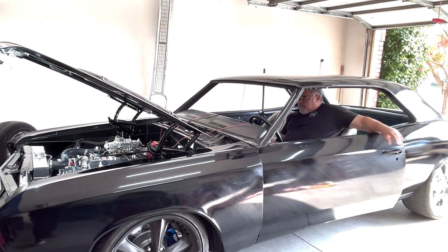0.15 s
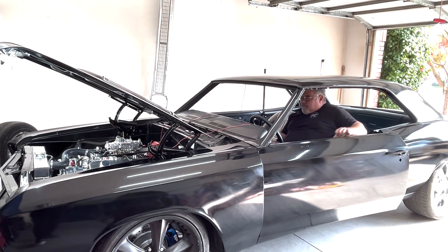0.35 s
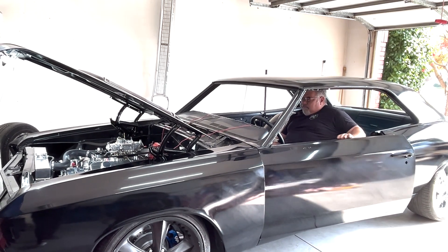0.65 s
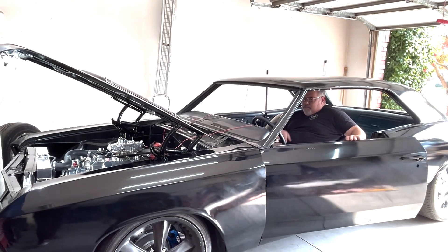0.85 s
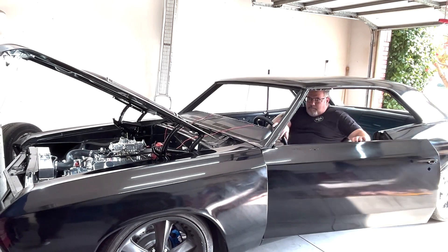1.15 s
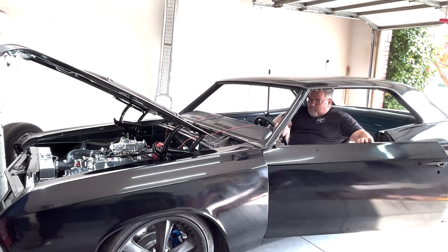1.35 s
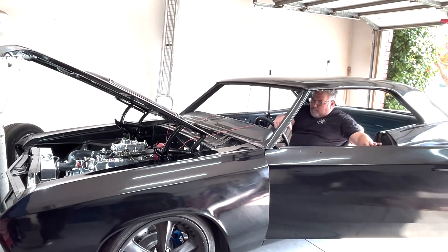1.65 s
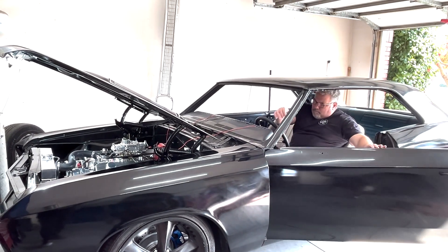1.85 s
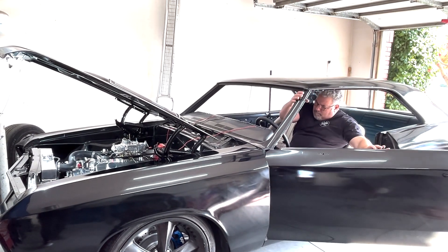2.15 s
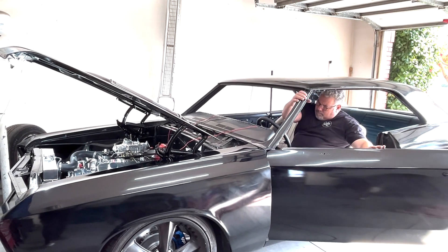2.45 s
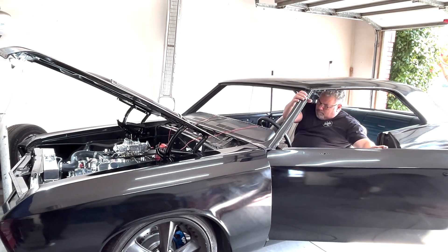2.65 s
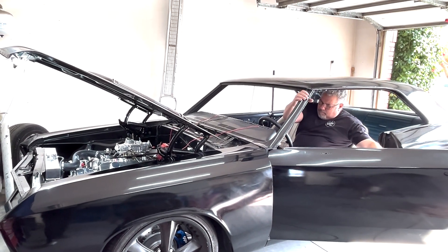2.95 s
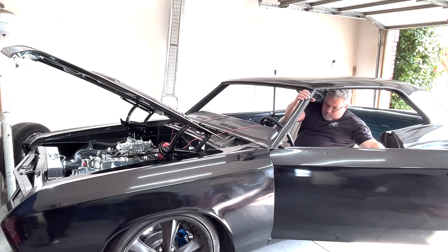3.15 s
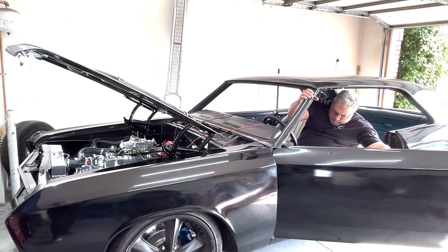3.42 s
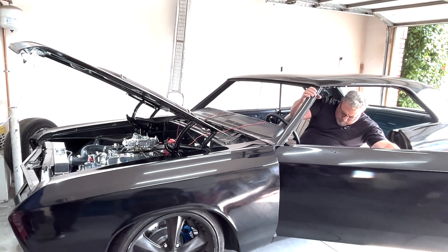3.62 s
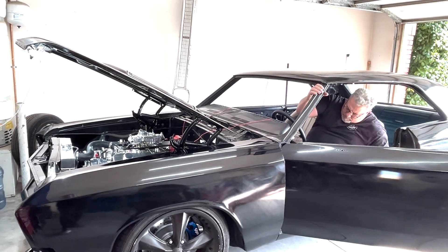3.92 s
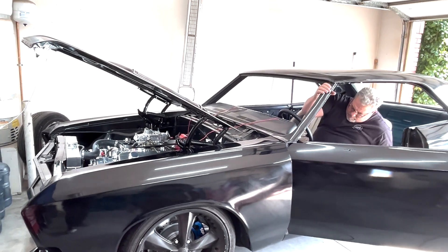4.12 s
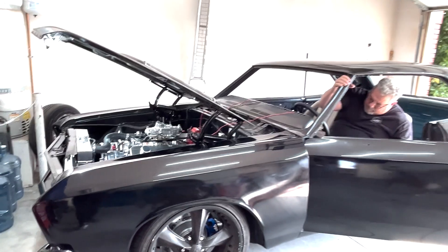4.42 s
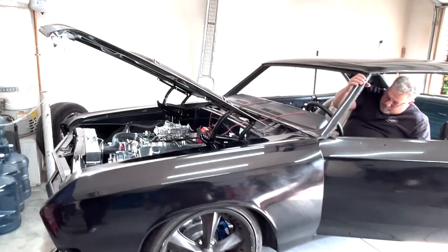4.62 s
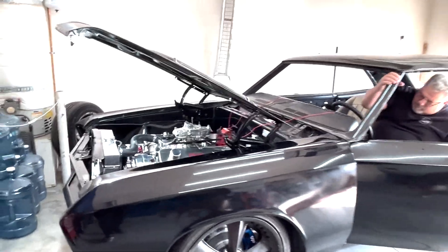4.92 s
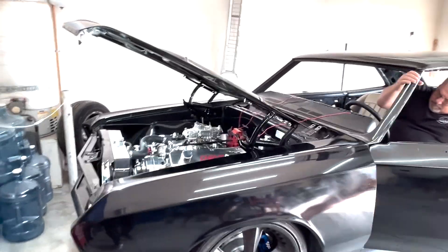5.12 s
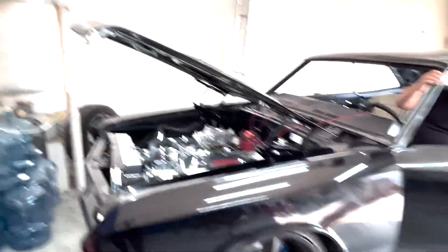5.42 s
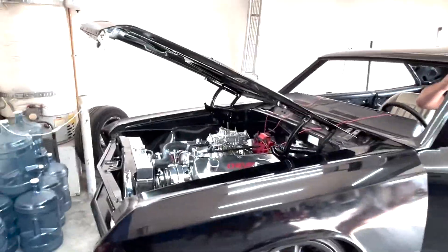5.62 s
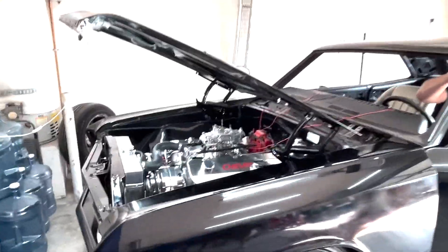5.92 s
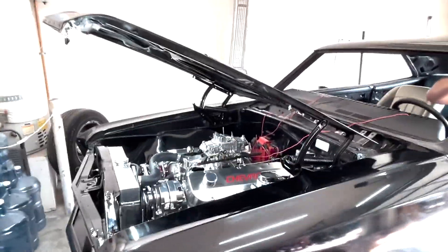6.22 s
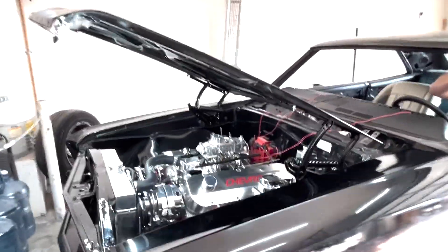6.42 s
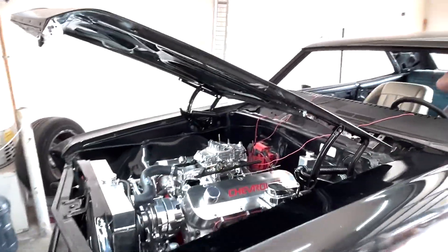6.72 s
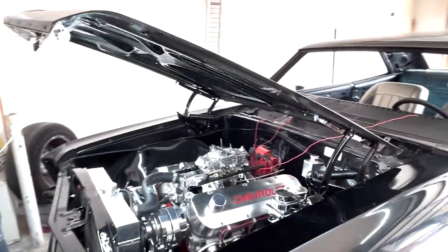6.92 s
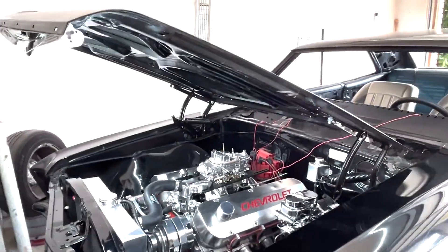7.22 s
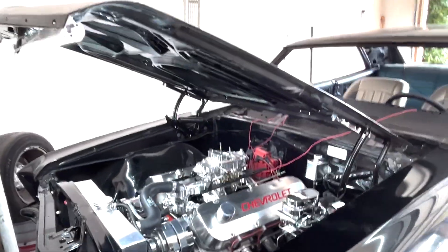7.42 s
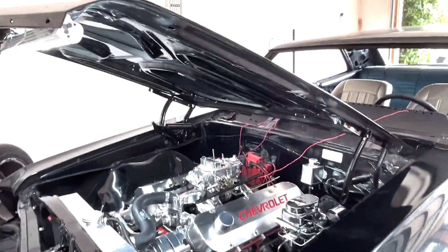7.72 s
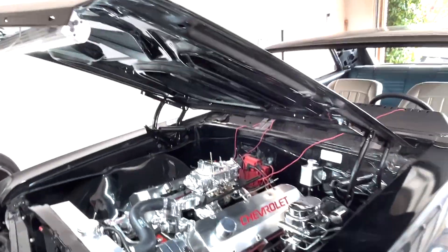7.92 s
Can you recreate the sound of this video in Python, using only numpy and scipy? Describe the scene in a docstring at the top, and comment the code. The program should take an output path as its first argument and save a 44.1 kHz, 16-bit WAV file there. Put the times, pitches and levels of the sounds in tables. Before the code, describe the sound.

A big V8 idles with a lumpy, loping rumble in a hard-walled garage, is revved once briefly, then settles back to uneven idle.

```python
"""A large V8 with a lumpy camshaft idles in a hard-walled garage, hood open: uneven exhaust pulses ring the
pipes and the garage air, fan and valve gear rush as shaped noise, the open carburettor hisses and gulps.
Near 4.7 s the throttle is blipped once: firings speed up, the drone clears and gliding sine overtones join.
From about 6 s the engine lopes at idle again. Meanwhile the microphone pair is carried from the door
towards the engine bay, which reweighs the resonances."""
import sys
import numpy as np
from scipy import signal
from scipy.fft import rfft, irfft, next_fast_len
from scipy.io import wavfile
from scipy.ndimage import uniform_filter1d

SR = 44100
rng = np.random.default_rng(int(sys.argv[2]) if len(sys.argv) > 2 else 0)


def dump_mix(stems):
    """Bounce the given channels to the path in sys.argv[1] as a 16-bit WAV at rate SR."""
    frames = np.atleast_2d(stems).T  # one column per channel
    limited = np.clip(frames, -1, 1)  # hard clip at full scale
    pcm = np.round(limited * 32767).astype(np.int16)
    wavfile.write(sys.argv[1], SR, pcm)


N = 355887
SIZE = next_fast_len(N, True)
BIN_HZ = np.maximum(np.arange(SIZE // 2 + 1) * SR / SIZE, 1)


# Crank and standpoint. Each row: time in seconds, firings per second, unevenness of the burns in dB,
# nearness to the engine bay 0-1.
CRANK = [(0, 73.4, 4, 0), (1.8, 75.8, 8, 0.03), (2.3, 61.5, 6, 0), (4.65, 66.6, 6.5, 0.07),
         (4.92, 105.6, 2, 0.27), (5.2, 111, 4, 0.33), (5.5, 100, 1.5, 0.37), (5.8, 99, 4, 0.48),
         (6.1, 81.4, 5.5, 0.67), (6.4, 69, 6, 0.73), (7.2, 61.2, 5.5, 0.76), (8.07, 64, 7, 0.93)]
# Load on the exhaust. Each row: time in seconds, drone between thumps in dB, bark in dB, thrum in dB.
LOAD = [(0.0, -19.5, -24, -36), (0.5, -38, -26, -25), (0.74, -20, -18, -29), (0.9, -23.5, -23.5, -26.5),
        (2.0, -24, -26, -29.5), (3.4, -23.5, -23, -24.5), (4.2, -20.5, -24, -32), (4.7, -24, -26.5, -27),
        (4.8, -25.5, -19.5, -24), (4.98, -7.5, -18, -24), (5.2, -10.5, -20.5, -29.69),
        (5.55, -12.5, -20, -30), (5.8, -21, -28.5, -41), (6.2, -20.5, -21.5, -41), (6.9, -21, -27, -32),
        (7.4, -25.5, -27, -27.5), (8.07, -20.5, -23, -34)]
# Runs of strong burns thump in the pipes. Each row: top in seconds, length in seconds, drone in dB.
THUMPS = [(0.067, 0.2, -30), (0.231, 0.28, -24.5), (0.48, 0.24, -18), (0.616, 0.18, -21.5),
          (0.762, 0.08, -32), (0.942, 0.054, -18), (1.177, 0.063, -23), (1.354, 0.11, -25),
          (1.621, 0.096, -23), (1.708, 0.31, -32), (1.877, 0.038, -27), (1.944, 0.057, -26.1),
          (2.091, 0.039, -31), (2.219, 0.11, -22), (2.321, 0.2, -32), (2.496, 0.11, -22),
          (2.669, 0.28, -27), (2.869, 0.056, -24), (2.999, 0.29, -28.5), (3.253, 0.042, -23),
          (3.375, 0.096, -20.5), (3.48, 0.077, -19), (3.571, 0.06, -17), (3.719, 0.12, -22.1),
          (3.831, 0.073, -21), (3.939, 0.031, -22), (4.143, 0.11, -19), (4.252, 0.091, -31),
          (4.508, 0.12, -14.5), (4.596, 0.11, -22), (4.663, 0.096, -19), (4.94, 0.073, -30),
          (5.0, 0.05, -23), (5.075, 0.069, -20), (5.165, 0.11, -15), (5.275, 0.07, -27),
          (5.335, 0.045, -35), (5.395, 0.081, -17), (5.455, 0.051, -17), (5.545, 0.13, -18),
          (5.647, 0.07, -12.5), (5.747, 0.13, -15), (5.861, 0.052, -17), (6.066, 0.12, -15.5),
          (6.294, 0.09, -16.5), (6.44, 0.16, -25), (6.514, 0.065, -21), (6.706, 0.19, -14),
          (6.919, 0.091, -17), (7.092, 0.29, -21), (7.227, 0.15, -19), (7.446, 0.21, -21),
          (7.554, 0.076, -20), (7.62, 0.078, -15.5), (7.769, 0.19, -26), (7.892, 0.084, -17),
          (7.989, 0.21, -22.5)]
# Failed burns change the note. Each row: top in seconds, length in seconds, drone change in dB,
# bark change in dB.
MISFIRES = [(0.357, 0.13, -3, -1), (0.81, 0.074, -1, -4), (0.879, 0.086, 0, -3), (1.47, 0.045, -7, 2.5),
            (1.785, 0.11, -6, 4), (2.055, 0.036, -10, -5), (2.169, 0.073, -8, 2), (2.256, 0.044, -11, 0),
            (2.424, .06, -2, 0.5), (2.546, 0.088, -3, -1), (2.805, .08, -2, -2.5), (2.999, 0.18, 0.5, -3),
            (3.32, .09, -9, -1), (3.421, 0.095, -11, -5.5), (3.648, 0.062, -5, -7), (3.881, .08, -4, -3),
            (3.992, 0.058, -5, -2), (4.37, 0.11, -1.5, -5), (4.558, 0.038, -9, -1), (4.69, .08, 1, 2.5),
            (5.126, 0.045, -3, -3), (5.222, .07, -6, -1.5), (5.413, 0.11, 0.5, -2),
            (5.482, 0.068, -1, -3.5), (5.676, 0.035, -10, -1), (5.829, 0.072, -1, 2), (6.196, .2, -4.5, -6),
            (6.48, 0.05, -6.5, -4), (6.713, 0.038, -13, 0.5), (6.835, 0.13, -4, -0.5), (6.97, .07, -4, -3),
            (7.354, 0.17, -3, -5), (7.522, 0.044, -7, 7), (7.691, 0.083, -10, -8)]
# The idle lopes, about three times a second. Each row: top in seconds, length in seconds, boom in dB.
LOPES = [(0.24, 0.3, -24), (0.55, 0.59, -27), (1.053, 0.18, -34), (1.437, 0.087, -25), (1.878, 0.18, -37),
         (2.249, 0.27, -30), (2.915, 0.11, -21), (3.32, 0.13, -24), (3.674, 0.32, -25), (4.163, 0.35, -23),
         (4.503, 0.35, -23), (4.887, 0.26, -22), (5.48, 0.14, -25), (5.91, 0.47, -29), (6.125, 0.27, -22),
         (6.533, 0.22, -30), (6.697, 0.25, -31), (6.976, 0.56, -28), (7.306, 0.45, -32), (7.596, 0.19, -32),
         (7.8, 0.16, -23), (7.95, 0.16, -28)]
THUMP_BARK_DB = -17.5   # bark of a thump, added to the loaded bark
LOPE_BARK_DB, LOPE_THRUM_DB, THRUM_LATE_S = 2, 3, 0.34


def exhaust():
    """One train of burns excites five groups of resonances in pipes and air; the blip adds overtones."""
    per_s, uneven_db, near = in_time(CRANK)
    drone_db, bark_db, thrum_db = in_time(LOAD)
    pulses = firings(per_s, uneven_db, jitter_s_per_db=0.0004087)
    thumps = swells(THUMPS)
    drone_holes = from_db(lifts([(s, length_s, db) for s, length_s, db, _ in MISFIRES]))
    bark_holes = from_db(lifts([(s, length_s, db) for s, length_s, _, db in MISFIRES]))

    lope = [(s, length_s, 0) for s, length_s, _ in LOPES]
    bark_gain = from_db(bark_db + LOPE_BARK_DB * (swells(lope) - 1.5))
    bark_gain = (bark_gain + from_db(THUMP_BARK_DB) * thumps) * bark_holes
    thrum_db = thrum_db + LOPE_THRUM_DB * (swells(lope, late_s=THRUM_LATE_S) - .5)

    out = drone_holes * drone(pulses, per_s, near, from_db(drone_db), thumps)
    out = out + bark_gain * bark(pulses, near)
    out = out + throat(pulses, near, bark_gain)
    out = out + boom(pulses, near)
    out = out + from_db(thrum_db) * thrum(pulses, near)
    return out + bark_holes * overtones(thumps)


# Strength of each cylinder's burn in dB, in firing order.
CYLINDER_DB = [1.5, -3, 2, -4.5, 0, 2.6, 0, 2]


def firings(per_s, uneven_db, jitter_s_per_db):
    """A pulse a firing, off in time and strength by chance; a second, scrambled train feeds the side."""
    at = np.flatnonzero(np.diff(np.floor(np.cumsum(per_s) / SR)))
    chance = rng.standard_normal((1000, 3))[:len(at)]
    late = chance[:, 0] * jitter_s_per_db * uneven_db[at] * SR   # samples; uneven burns also come off time
    where = np.clip(at + late.astype(int), 0, N - 1)
    chance_db = uneven_db[at] * np.minimum(chance[:, 1], .8)   # a burn can fail, but not exceed a full charge
    pulses = np.full((2, N), 1e-18)
    pulses[0, where] = from_db(np.resize(CYLINDER_DB, len(at)) + chance_db)
    pulses[1, where] = chance[:, 2]
    return pulses / np.sqrt(np.mean(pulses ** 2, axis=1, keepdims=True))


WIDEN = 1.52   # on the nominal width of each of the two stages


def ringing(pulses, modes, near, sustain):
    """Each resonance applied twice, so valleys stay dark; walls sustain it, the standpoint weighs it."""
    out = 0
    for k, (hz, width_hz, *levels_db) in enumerate(modes):
        once = resonance(pulses, hz, WIDEN * width_hz)
        rung = evened(resonance(once, hz, WIDEN * width_hz), 0.18, sustain)
        out = out + (-1) ** k * from_db(by_standpoint(near, levels_db)) * rung
    return out


# Drone of the pipes. Each row: centre in Hz, nominal width in Hz, dB by the door, dB halfway, dB by the bay.
DRONE = [(100.2, 12.6, -4, -3.5, 2.7), (112.5, 12.5, 3.5, 8.5, 5.7), (117.1, 13.8, 5.5, 1, 6.5),
         (127.9, 8.8, -3.5, -2.5, 0.5)]
# Pitch at which the thumps ring clear. Each row: time in seconds, pitch in Hz.
THUMP_PITCH = [(0.0, 112.6), (0.06, 118.3), (0.31, 110.8), (0.54, 120), (0.99, 110.6), (1.1, 120.8),
               (1.24, 109.8), (1.73, 125), (1.84, 106.5), (1.91, 124), (2.02, 126.6), (2.11, 113.2),
               (2.54, 128), (2.79, 112.1), (2.85, 118.6), (3.42, 118), (3.89, 108.9), (4.11, 121.9),
               (4.32, 108.3), (4.65, 118.9), (4.77, 106.3), (4.87, 105.2), (4.92, 111.9), (5.29, 112.1),
               (5.35, 105.8), (5.42, 106.8), (5.5, 100.9), (5.66, 100.9), (5.69, 98.4), (5.82, 98.5),
               (5.86, 104), (6.03, 104.1), (6.08, 109.9), (6.25, 117.2), (6.31, 108.2), (6.49, 116.7),
               (6.63, 104.7), (6.79, 103.6), (7.06, 115.4), (7.28, 102.2), (7.42, 116.8), (7.66, 111.2),
               (7.78, 127.4), (7.87, 107.9), (8.07, 118.5)]
THUMP_CLEAR, DRONE_CLEAR, THUMP_WAVER_HZ = 0.81, 0.25, 1.537   # clear-tone weights, pitch spread
BLIP_CLEAR = 0.68   # share of the pulse-rung drone lost at blip speed; half of it is added as clear tone


def drone(pulses, per_s, near, steady, thumps):
    """Pipes ring between and during thumps, part pulse-excited, part clear tone; clearer at blip speed."""
    blip = BLIP_CLEAR * np.clip((per_s - 85) / 20, 0, 1)
    rough_gain = (1 - blip) * (steady + (1 - THUMP_CLEAR) * thumps)
    clear_gain = (DRONE_CLEAR + blip / 2) * steady + THUMP_CLEAR * thumps
    rung = rough_gain * ringing(pulses, DRONE, near, sustain=0.91) / 2
    rung = rung + clear_gain * clear_ring(THUMP_PITCH, THUMP_WAVER_HZ)
    level = steady + thumps
    return level * evened(rung / level, 0.0604, 0.92)


# Bark of the pipes. Each row: centre in Hz, nominal width in Hz, dB by the door, dB halfway, dB by the bay.
BARK = [(144.4, 5.5, -6.5, -4, -9), (171, 14.7, 1, -3.5, -9), (185, 12.6, -13, 0, -7),
        (196.8, 9.5, -2, -7, -4.5), (210.8, 13.4, -4, -7.5, -18), (236.4, 6.9, 0, -5.5, -1),
        (263, 21.4, -8, -1, -7), (304.7, 9.8, -10.5, -12.5, -20), (320.5, 10.8, -10, -7.5, -19.5),
        (346.6, 7.7, -11.5, -11, -19.5), (395.5, 46, -11, -7.5, -13)]


def bark(pulses, near):
    """Upper pipe resonances, rung by the burns."""
    return evened(ringing(pulses, BARK, near, sustain=0.41), 0.051, 0.48)


# Short header pipes. Each row: centre in Hz, nominal width in Hz, dB by the door, dB halfway, dB by the bay.
THROAT = [(439.4, 37, 6, 1, 3), (552.3, 26, 5, -4, -16), (680, 92, -9, 5, -17), (807, 174, -9.5, 3, 5.5)]
# The header pipes roar up. Each row: top in seconds, length in seconds, lift in dB.
ROARS = [(.63, 0.12, 0), (3.56, 0.13, 9), (4.5, 0.13, 4), (4.86, 0.22, 2.5), (5.04, 0.37, 7.5),
         (5.72, .1, 6)]


def throat(pulses, near, bark_gain):
    """Header pipes ring with the burns and roar with the load, taken as the smoothed bark gain."""
    load = uniform_filter1d(bark_gain, int(.25 * SR))
    gain = from_db(-12 + lifts(ROARS)) * load ** 1.254
    return gain * evened(ringing(pulses, THROAT, near, sustain=0.14), 0.011, 0.38)


# Boom of the garage air. Each row: centre in Hz, nominal width in Hz, dB by the door, dB halfway,
# dB by the bay.
BOOM = [(45.44, 3.3, 1, 8, 1)]
# Pitch at which the garage air booms clear. Each row: time in seconds, pitch in Hz.
BOOM_PITCH = [(0.0, 46.2), (1.01, 48.4), (1.32, 41.0), (1.57, 45.8), (2.18, 42.4), (2.29, 47.0),
              (2.63, 41.8), (2.81, 46.9), (4.54, 43.7), (4.72, 41.0), (4.96, 49.8), (7.12, 45.0),
              (7.26, 41.0), (7.4, 45.5), (7.93, 46.3), (8.07, 51.8)]
# The boom dips or lifts. Each row: top in seconds, length in seconds, change in dB.
BOOM_GAPS = [(1.8, .14, -4), (3.46, 0.17, -16), (4.01, .15, -2), (4.68, .2, -5), (5.3, .4, -2),
             (6.04, 0.097, 1), (6.78, 0.083, 3), (7.5, 0.095, 1), (7.87, 0.082, -10)]
BOOM_REST_DB, BOOM_CLEAR, BOOM_WAVER_HZ = -29, 0.57, 1.29   # level between lopes, clear share, pitch spread


def boom(pulses, near):
    """Garage air rings with the burns and as a clear tone, swelling with each lope."""
    rung = (1 - BOOM_CLEAR) * ringing(pulses, BOOM, near, sustain=1.0)
    rung = rung + BOOM_CLEAR * clear_ring(BOOM_PITCH, BOOM_WAVER_HZ)
    gain = from_db(lifts(BOOM_GAPS)) * (from_db(BOOM_REST_DB) + swells(LOPES))
    # the slow air column cannot follow quick changes
    return resonance(gain * evened(rung, 0.14, 0.7), 36.0, 30)


# Low thrum. Each row: centre in Hz, nominal width in Hz, dB by the door, dB halfway, dB by the bay.
THRUM = [(34.3, 5, -13, -8, -15), (69.5, 3.5, -10, -4, -5), (80.2, 8.2, -8.5, -4.5, -7)]


def thrum(pulses, near):
    """Low resonances of pipes and garage air, rung by the burns."""
    return evened(ringing(pulses, THRUM, near, sustain=.3), 0.14, 0.76)


# Clear overtones of the blip. Each row: start in seconds, end in seconds, start pitch in Hz,
# end pitch in Hz, start level in dB, end level in dB.
OVERTONES = [(4.78, 4.89, 198.2, 197, -23, -25), (4.9, 5.131, 198.8, 198, -22, -17),
             (5.14, 5.412, 199.4, 197, -22, -23), (5.47, 5.6, 197.6, 202, -19, -25),
             (5.65, 5.984, 197.2, 197.4, -25, -29), (4.8, 4.972, 320, 328, -27, -33),
             (4.847, 5.224, 402, 400, -36, -38), (5.097, 5.397, 243, 238.2, -24.5, -30.5),
             (5.146, 5.377, 325, 340, -29.5, -35), (5.401, 5.623, 400, 399, -33.5, -34),
             (5.4, 5.78, 268, 250.3, -28, -31.5), (5.8, 5.917, 241, 240, -28.5, -30)]
OVERTONE_THUMP_DB = 6.5   # lift at a thump gain of 1; follows the root of the gain


def overtones(thumps):
    """Sum of the blip's sines, lifted by the thumps."""
    return from_db(OVERTONE_THUMP_DB * np.sqrt(thumps)) * sum(overtone(*row) for row in OVERTONES)


OVERTONE_WAVER_HZ, OVERTONE_FLUTTER_DB = 2.014, 0.5


def overtone(start_s, end_s, start_hz, end_hz, start_db, end_db):
    """A gliding, fluttering sine that fades in and out, in the mid only."""
    at = np.arange(int(start_s * SR), int(end_s * SR))
    t = at / SR
    ends_s = [start_s, end_s]
    fade = np.clip(np.minimum(t - start_s, end_s - t) / 0.033, 0, 1)
    level_db = np.interp(t, ends_s, [start_db, end_db]) + OVERTONE_FLUTTER_DB * drift(6.2)[at]
    hz = np.interp(t, ends_s, [start_hz, end_hz]) + OVERTONE_WAVER_HZ * drift(2.75)[at]
    out = np.zeros((2, N))
    out[0, at] = fade * from_db(level_db) * np.sqrt(2) * np.sin(2 * np.pi * np.cumsum(hz) / SR)
    return out


def clear_ring(pitch, waver_hz):
    """Pipe or air column rings as a slightly wavering sine, a quarter turn apart in mid and side."""
    turns = np.cumsum(in_time(pitch)[0] + waver_hz * drift(5.08)) / SR
    return np.sqrt(2) * np.array([np.sin(2 * np.pi * turns), -0.4 * np.cos(2 * np.pi * turns)])


# Engine bay. Each row: time in seconds, carburettor hiss between gulps in dB (before the hiss's final lift),
# rush in dB.
BAY = [(0.0, -46, -34.5), (0.7, -47.5, -36.5), (2.0, -46, -35.5), (3.4, -45, -35), (4.3, -45, -33.5),
       (4.69, -42.5, -34), (4.72, -38.5, -31), (4.96, -37.5, -29), (5.2, -41.5, -30.5), (5.8, -43.5, -33),
       (6.3, -43, -33.5), (7.4, -42, -32), (8.07, -42.5, -33.5)]
# The carburettor gulps air. Each row: top in seconds, length in seconds, hiss in dB (before the final lift).
GULPS = [(0.125, 0.083, -56), (0.3, 0.059, -71), (0.87, 0.1, -58), (0.99, 0.1, -57), (1.334, 0.15, -49),
         (1.572, 0.091, -57), (1.7, 0.074, -69), (1.889, 0.12, -52), (2.1, 0.14, -58), (3.1, 0.11, -55),
         (3.02, 0.058, -60), (3.2, 0.06, -54), (3.9, 0.077, -66), (3.55, 0.067, -57), (4.6, 0.062, -56),
         (2.234, 0.08, -55), (2.573, 0.061, -49), (2.738, 0.069, -52), (2.83, 0.071, -52),
         (2.914, 0.13, -48), (3.289, 0.097, -47), (3.462, 0.043, -58), (3.657, 0.11, -48),
         (4.035, 0.12, -46), (4.13, 0.21, -49), (4.38, 0.13, -50), (4.481, 0.18, -50), (4.73, 0.053, -50),
         (4.819, 0.047, -54), (6.294, 0.18, -52), (6.458, 0.13, -52), (6.648, 0.38, -56), (7.112, 0.1, -55),
         (7.45, 0.098, -48), (7.56, 0.14, -51), (7.817, 0.24, -47.5)]
GULP_RISE = 0.46   # share of a gulp spent rising
GULP_RUSH_DB, GULP_FROM_HZ = -5, 2900   # gulps and cam beat lift the rush mainly above this


def rush():
    """Fan and valve gear: panel-coloured noise, brightened by gulps and the cam beat."""
    noise = rush_noise()
    level = from_db(in_time(BAY)[1])
    bright = signal.lfilter(*signal.butter(1, GULP_FROM_HZ, "high", fs=SR), noise)
    gulps = from_db(GULP_RUSH_DB) * swells(GULPS, rise=GULP_RISE)
    beat = (from_db(1.7 * cam_beat(4.2)) - 1) * level
    return level * noise + (gulps + beat) * bright


# Colour of the rush. Each row: frequency in Hz, relative density in dB per Hz.
RUSH = [(350, -6.5), (500, -3), (850, -11), (1020, -7), (1360, -9.5), (1660, -7.5), (2060, -10.5),
        (2900, -16), (3700, -17.5), (4800, -17), (6000, -21.5), (8000, -44)]
# Sheet metal of the bay. Each row: centre in Hz, width in Hz, lift in dB by the door, halfway, by the bay.
RUSH_MODES = [(1640, 160, -1, 1.5, -0.5), (1350, 40, -4, -3, -1), (2500, 470, 1, 3.5, 0.5),
              (3570, 2000, 0.5, -6.5, 7.5), (4690, 400, 2.5, 2.5, 2), (1100, 31, 3.5, 2, -4),
              (1290, 55, 3.5, -1, 1), (1467, 40, 3, 3, 0.5), (1643, 39, 0.5, 3, 0), (1780, 71, 4, -1, 2.5),
              (1897, 71, -1, -7, -8), (1930, 60, 1.5, 6, 4), (2140, 67, 0, 0, -6), (2300, 65, 2, -2, 0),
              (2590, 160, 2.5, 1, 2.5), (3130, 130, 1.5, 0.5, 1.5), (3670, 230, -6, -11, -1),
              (3960, 160, 3, -3, 0), (4160, 100, -1, -2, -2), (4930, 110, -1.5, 0.5, 4.5)]
# Two narrow resonances slide as the standpoint moves. Each row: time in seconds, lower centre in Hz,
# its lift in dB, upper centre in Hz, its lift in dB.
SLIDING = [(0, 1045, 7.5, 1600, 7), (2.3, 1042, 10, 1600, 3.5), (4.2, 1049, 7, 1690, 4),
           (4.6, 1021, 9, 1700, 3.5), (5.2, 976, 7, 1550, 3.5), (5.7, 953, 12, 1524, 9.5),
           (6.2, 1010, 1, 1545, 5), (6.6, 995, 7, 1630, 4), (7.2, 1000, 5, 1640, 3.5),
           (8.07, 988.5, 7.5, 1630, 10)]
# The upper sliding resonance changes level. Each row: top in seconds, length in seconds, change in dB.
PANEL_RINGS = [(4.37, .16, 9), (4.62, .25, 7), (5.35, 0.31, 3), (6.3, 0.33, 9), (7.3, .3, -1)]
SLIDING_WIDTH_HZ, VALVE_DB = 24.5, -20   # valve ticks under the steady rush


def rush_noise():
    """Broad noise that ticks with the valves, shaped by panels that each ring unsteadily; rms 1."""
    near = in_time(CRANK)[2]
    unsteady = [drift(15.5) for _ in range(5)]
    noise = air_noise(RUSH) * (1 + from_db(VALVE_DB) * valve_gate())
    for k, (hz, width_hz, *levels_db) in enumerate(RUSH_MODES):
        lift_db = by_standpoint(near, levels_db) + 1.86 * unsteady[k % 5]
        noise = noise + (from_db(lift_db) - 1) * resonance(noise, hz, width_hz)
    low_hz, low_db, high_hz, high_db = in_time(SLIDING)
    for hz, lift_db in (low_hz, low_db), (high_hz, high_db + lifts(PANEL_RINGS)):
        gain = from_db(lift_db + .5 * drift(14)) - 1
        noise = noise + gain * sliding(noise, hz, SLIDING_WIDTH_HZ)
    return rms_one(noise)


VALVE_TICK_S = 0.0045   # decay time


def valve_gate():
    """Each firing opens a short dying gate of uneven height; rms 1."""
    per_s, uneven_db, _ = in_time(CRANK)
    r = np.exp(-1 / (VALVE_TICK_S * SR))
    pulses = firings(per_s, uneven_db, jitter_s_per_db=0.00054)[0]
    return rms_one(signal.lfilter([1], [1, -r], pulses))


SLIDING_STEADY = 0.31   # share of its chance swells that is evened out


def sliding(x, hz, width_hz):
    """Resonance whose centre moves: shift it to zero, smooth, shift back; swells partly evened."""
    turn = np.exp(2j * np.pi * np.cumsum(hz) / SR)
    r = np.exp(-np.pi * width_hz / SR)
    rung = 2 * np.real(signal.lfilter([1 - r], [1, -r], x / turn) * turn)
    return np.std(rung) * evened(rung, 0.088, SLIDING_STEADY)


def cam_beat(sharpness):
    """One swell a camshaft turn (eight firings), wandering a little; between 0 and 1."""
    turns = np.cumsum(in_time(CRANK)[0]) / SR / 8 + .3 * drift(1.5)
    return (.5 + .5 * np.cos(2 * np.pi * turns)) ** sharpness


# Carburettor throat. Values: centre in Hz, width in Hz, lift in dB by the door, halfway, by the bay.
WHISTLE = (8440, 390, 0.97, 6.6, 8)
# Hiss above the split over the rest, between gulps. Each row: time in seconds, level in dB.
TOP_HISS = [(0, 0), (.7, 1), (2.2, 0), (4, 0), (4.9, -1), (5.2, -3), (5.7, -2.5), (6.2, -2), (6.5, -1),
            (7.6, -1), (8.07, 1)]
TOP_SPLIT_HZ, TOP_GULP_DB = 9100, 1.5   # gulps are stronger above the split
HISS_LIFT_DB = 7.5


def hiss():
    """Air sucked past the throttle plates: two bands of noise that flutter, gulp and beat with the cam."""
    ports = hiss_ports()
    bands = [ports * (BIN_HZ < TOP_SPLIT_HZ), ports * (BIN_HZ >= TOP_SPLIT_HZ)]
    low, top = irfft(bands, SIZE)[..., :N]
    whistle_hz, width_hz, *levels_db = WHISTLE
    whistle_db = by_standpoint(in_time(CRANK)[2], levels_db)
    low = low + (from_db(whistle_db) - 1) * resonance(low, whistle_hz, width_hz)

    steady = from_db(in_time(BAY)[0])
    gulps = swells(GULPS, rise=GULP_RISE)
    flutter = drift(49)
    low = (steady + gulps) * from_db(0.55 * flutter) * low
    top_gain = steady * from_db(in_time(TOP_HISS)[0]) + from_db(TOP_GULP_DB) * gulps
    top = top_gain * from_db(0.84 * flutter + 1.1 * drift(6)) * top
    return from_db(HISS_LIFT_DB + 0.75 * cam_beat(3.2)) * (low + top)


# Colour of the hiss. Each row: frequency in Hz, relative density at one port in dB per Hz.
HISS = [(1500, -4), (2500, -3.5), (3600, -2), (4800, -6.5), (5800, -7), (7000, -6.5), (7800, -8),
        (8700, -13), (10000, -5.5), (11000, -8), (12800, -10.5), (14000, -9.5), (15700, -16.5)]
# Likeness of the ports. Each row: frequency in Hz, share of the hiss common to both 0-1.
LIKENESS = [(2000, 0.08), (7000, 0.12), (8300, 1), (9300, 0.24), (10800, 0.82), (11500, 1), (12600, .97),
            (13400, .68), (14300, 0.7), (15000, 1)]
PORT_LAG_S, IN_STEP_HZ = .000152, 11800   # left hears the hiss late; pitch at which both are in step


def hiss_ports():
    """Spectra of the hiss at both microphone ports, partly alike by frequency."""
    left, other = rfft(air_noise(HISS), SIZE)
    alike = at_hz(LIKENESS, BIN_HZ)
    lead = np.exp(2j * np.pi * (BIN_HZ - IN_STEP_HZ) * PORT_LAG_S)
    right = alike * left * lead + np.sqrt(1 - alike ** 2) * other
    tilt = from_db(at_hz(TILT, BIN_HZ) / 2)
    return np.array([left * tilt, right / tilt])


def air_noise(spectrum):
    """Two unrelated noises of one colour; rms 1."""
    white = rfft(rng.standard_normal((2, SIZE)))
    return rms_one(irfft(white * from_db(at_hz(spectrum, BIN_HZ)), SIZE)[:, :N])


def drift(rate_hz):
    """Slow chance: noise at every 40th sample, twice smoothed; rms 1."""
    r = np.exp(-80 * np.pi * rate_hz / SR)
    slow = signal.lfilter([1], [1, -2 * r, r * r], rng.standard_normal(N // 40 + 2002))[2000:]
    return np.interp(np.arange(N) / 40, np.arange(len(slow)), rms_one(slow))


def from_db(db):
    """Gain of a level in dB."""
    return np.exp(np.asarray(db) * (np.log(10) / 20))


def swells(rows, late_s=0, rise=.5, unit=from_db):
    """Gain of events that rise and fall smoothly about their top."""
    out = np.zeros(N)
    for s, length_s, level_db in rows:
        share = np.arange(int(length_s * SR)) / (length_s * SR)
        at = (share * length_s * SR + (s + late_s - rise * length_s) * SR).astype(int)
        inside = (at >= 0) & (at < N)
        shape = np.sin(np.pi * np.interp(share, [0, rise, 1], [0, .5, 1])) ** 2
        out[at[inside]] += unit(level_db) * shape[inside]
    return out


def lifts(rows):
    """Events as a change in dB that comes and goes about their top."""
    return swells(rows, unit=float)


def resonance(x, hz, width_hz):
    """Two-pole resonance, gain about 1 on top."""
    r = np.exp(-np.pi * width_hz / SR)
    poles = [1, -2 * r * np.cos(2 * np.pi * hz / SR), r * r]
    return signal.lfilter([(1 - r * r) / 2, 0, (r * r - 1) / 2], poles, x)


def evened(x, seconds, share):
    """Part of the chance swells slower than the given time is divided out; rms near 1."""
    power = uniform_filter1d(x[:, ::16] ** 2, int(seconds * SR / 16))
    mean = np.mean(power, axis=1, keepdims=True)
    gain = (power / mean + 0.0044) ** (-share / 2) / np.sqrt(mean)
    return x * [np.interp(np.arange(N) / 16, np.arange(len(g)), g) for g in gain]


def by_standpoint(near, levels_db):
    """Level between door, halfway and bay."""
    return np.interp(near, [0, .5, 1], levels_db)


def rms_one(x):
    """Scale to rms 1."""
    return x / np.sqrt(np.mean(x ** 2) + 1e-20)


def in_time(rows):
    """Columns of a curve, one value a sample."""
    s, *columns = np.transpose(rows)
    return [np.interp(np.arange(N) / SR, s, c) for c in columns]


def at_hz(points, hz):
    """Read a spectrum on a log-frequency axis."""
    points = np.array(points)
    return np.interp(np.log(hz), np.log(points[:, 0]), points[:, 1])


# Stereo width. Each row: frequency in Hz, gain of the side in dB.
WIDTH = [(40, -28), (100, -21.5), (170, -16), (300, -8.5), (500, -2), (1000, -1.8), (4000, 0)]
# Colour of the ports. Each row: frequency in Hz, left minus right in dB.
TILT = [(60, .35), (260, .3), (400, 2), (600, 1.8), (1100, .6), (1650, -.3), (2400, .3), (3400, 4.3),
        (5000, 6.3), (7200, 1.5), (10400, -1), (15000, 0)]
# Phase between the ports. Each row: frequency in Hz, lead of the right in radians.
RIGHT_LEADS = [(50, .05), (110, .1), (220, .25), (450, .15), (800, -.5), (1200, -.4), (1600, 0)]


def to_stereo(mid_side):
    """Side takes its level, and each microphone port its colour and lead, by frequency."""
    mid, side = rfft(mid_side, SIZE)
    side = side * from_db(at_hz(WIDTH, BIN_HZ))
    tilt = from_db(at_hz(TILT, BIN_HZ) / 2) * np.exp(-.5j * at_hz(RIGHT_LEADS, BIN_HZ))
    return irfft(np.array([(mid + side) * tilt, (mid - side) / tilt]), SIZE)[:, :N]


PAN_BY_BAY_DB = -1.5   # left minus right at nearness 1


def scene():
    """Exhaust and rush, leaning to one side near the bay, plus carburettor hiss."""
    lean = from_db(PAN_BY_BAY_DB * in_time(CRANK)[2] * [[.5], [-.5]])
    return lean * to_stereo(exhaust() + rush()) + hiss()


CUTOFF_HZ = 15740


def record(dry):
    """The microphones lose the deepest bass, peaks are rounded, the top is cut."""
    x = signal.sosfilt(signal.butter(4, 31, "high", fs=SR, output="sos"), dry)
    steep = signal.ellip(14, .5, 70, CUTOFF_HZ, fs=SR, output="sos")
    return signal.sosfilt(steep, 1.215 * np.tanh(x / 1.059))


dry = scene()
out = record(dry)
dump_mix(out)
```